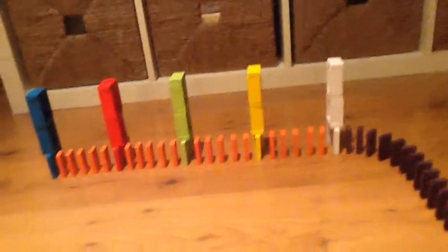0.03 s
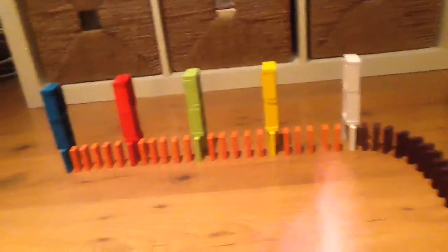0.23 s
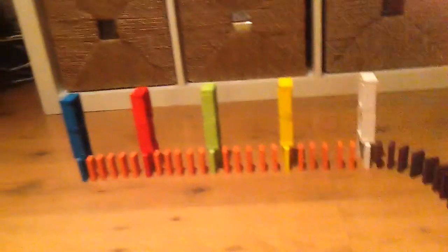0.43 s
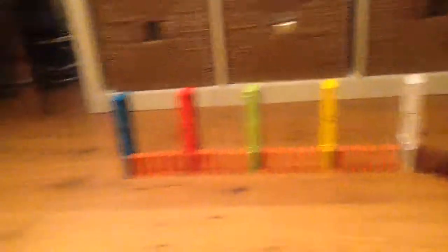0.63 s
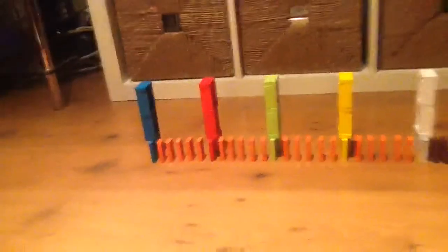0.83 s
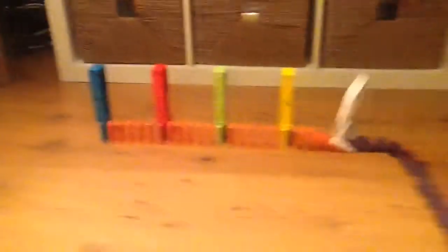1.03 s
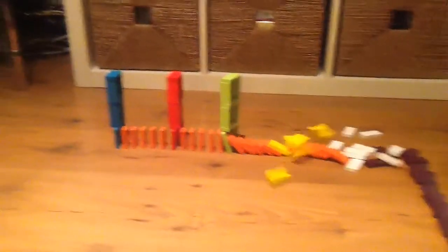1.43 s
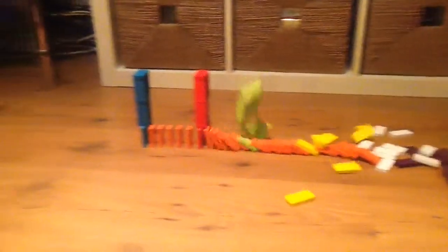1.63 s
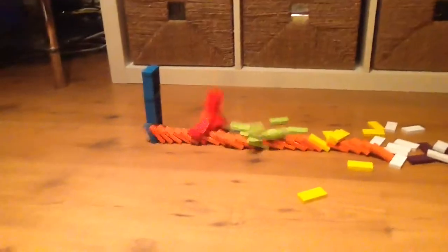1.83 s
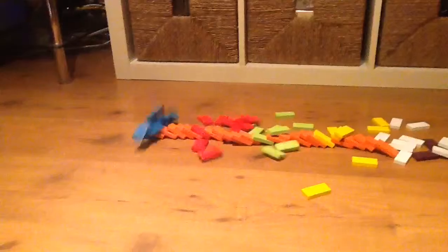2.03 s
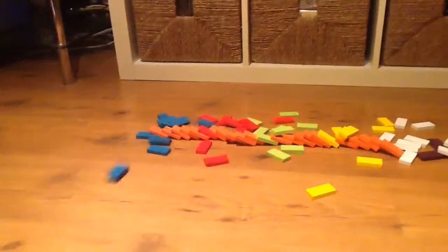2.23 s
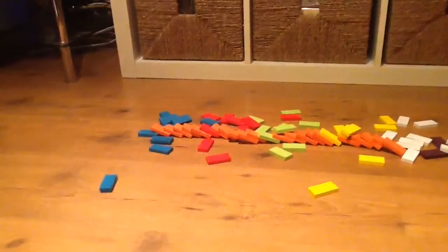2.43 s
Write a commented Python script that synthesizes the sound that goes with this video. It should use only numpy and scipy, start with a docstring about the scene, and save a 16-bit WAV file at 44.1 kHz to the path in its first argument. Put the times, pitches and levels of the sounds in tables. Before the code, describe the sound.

Plastic dominoes tick over in a chain, then small towers crash onto a wooden floor.

```python
"""Plastic dominoes topple across a wooden floor in a small room, close to a hand-held camera.
The ticking chain runs for about 1 s, then towers crash down and scatter their tiles.
Each contact is a snap, a chatter of rebounds and a short ring; edge strikes ping on.
The grip creaks on the camera case and the hand bumps it softly, over still air and faint mains hum."""
import sys
import numpy as np
from scipy import signal
from scipy.fft import rfft, irfft
from scipy.io import wavfile

SR = 44100
rng = np.random.default_rng(int(sys.argv[2]) if len(sys.argv) > 2 else 0)


def log_audio(samples):
    """Write samples as a 16-bit WAV file to the path given in sys.argv[1]."""
    # one column per channel
    frames = np.atleast_2d(samples).T
    # limit to full scale, then quantise
    limited = np.clip(frames, -1, 1)
    pcm = np.round(limited * 32767).astype(np.int16)
    wavfile.write(sys.argv[1], SR, pcm)


N = 114660
BLOW_ROOM_DB, CLATTER_ROOM_DB = -5.5, -2.5  # tail re direct sound


def undb(db):
    """Decibels to gain."""
    return 10 ** (np.asarray(db) / 20)


def unit(x):
    """Scale to unit energy."""
    return x / np.sqrt(np.sum(x ** 2))


def fade(t, t60):
    """Exponential decay, 60 dB in t60 seconds."""
    return np.exp(-np.log(1000) * t / t60)


def ring(t, hz, t60):
    """One struck mode."""
    return np.sin(2 * np.pi * hz * t) * fade(t, t60)


def add(out, start_s, sound):
    """Mix a sound in at start_s."""
    i = int(np.clip(start_s * SR, 0, N - 1))
    out[i:i + len(sound)] += sound[:N - i]


def colour(x, points, size=2048):
    """Minimum-phase filter through (f/Hz, gain/dB) points."""
    hz, db = np.array(points).T
    bin_hz = np.arange(size // 2 + 1) * SR / size
    gain = undb(np.interp(np.log(bin_hz + 1), np.log(hz), db))
    cepstrum = irfft(np.log(gain))
    cepstrum[1:size // 2] *= 2
    cepstrum[size // 2 + 1:] = 0
    return signal.fftconvolve(x, irfft(np.exp(rfft(cepstrum))))[:len(x)]


def treble(x):
    """The part above 6 kHz."""
    return signal.sosfiltfilt(signal.butter(2, 6000, "high", fs=SR, output="sos"), x)


def in_room(sound, room_db, size=12000, build_s=0.0041):
    """Add a diffuse tail, different from every spot on the floor; its treble dies first."""
    t = np.arange(size) / SR
    noise = rng.standard_normal(size) * (1 - np.exp(-t / build_s))
    high = treble(noise)
    tail = unit((noise - high) * fade(t, t60=0.26) + undb(-4) * high * fade(t, t60=0.21))
    return signal.fftconvolve(sound, (t == 0) + undb(room_db) * tail)[:size]


def contact(modes, ring_db, chatter_db, room_db):
    """One tile hit: snap, ring and tiny rebounds, the treble coloured by the spot struck."""
    scatter_db, detune, chatter_s, spot_spread_db = 9.5, 0.0617, 0.0062, 4
    t = np.arange(2000) / SR
    draws = rng.standard_normal((len(modes), 2))
    ringing = sum(undb(db + scatter_db * a) * ring(t, hz * (1 + detune * b), t60)
                  for (hz, db, t60), (a, b) in zip(modes, draws))
    rebounds = rng.standard_normal(len(t))
    chatter = rebounds * np.abs(rebounds) * np.exp(-(t / chatter_s) ** 2)
    hit = (t == 0) + undb(ring_db) * unit(ringing) + undb(chatter_db) * unit(chatter)
    spot_hz = 2000 * 2 ** (np.arange(10) / 3)
    spot_db = spot_spread_db * rng.standard_normal(len(spot_hz)) * (spot_hz > spot_hz[0])
    return in_room(unit(colour(hit, np.c_[spot_hz, spot_db])), room_db)


def blows(rows, modes, ring_db, chatter_db):
    """Single strong contacts, each with its own level and a tilt about 5 kHz."""
    out = np.zeros(N)
    for start_s, db, tilt_db in rows:
        hit = contact(modes, ring_db, chatter_db, BLOW_ROOM_DB)
        tilted = colour(hit, [(1250, -2 * tilt_db), (5000, 0), (10000, tilt_db)])
        add(out, start_s, undb(db) * tilted)
    return out


def clatter(times_s, level_db, treble_db, modes, ring_db, per_s, count=1600, scatter_db=5):
    """Light contacts at uneven moments, following a level curve and a treble curve."""
    hits = [contact(modes, ring_db, chatter_db=-6, room_db=CLATTER_ROOM_DB) for _ in range(64)]
    size_draw, sign_draw = rng.standard_normal((count, 2)).T
    starts_s = times_s[0] + (np.arange(count) + 2 * rng.random(count)) / per_s
    sizes = undb(scatter_db * np.minimum(size_draw, 2)) * np.sign(sign_draw)
    sizes *= np.sqrt(SR / per_s) / np.std(sizes)  # unit mean power
    sizes *= undb(np.interp(starts_s, times_s, level_db))
    out = np.zeros(N)
    for k in np.flatnonzero(starts_s < times_s[-1]):
        add(out, starts_s[k], sizes[k] * hits[k % len(hits)])
    treble_gain = undb(np.interp(np.arange(N) / SR, times_s, treble_db))
    return out + (treble_gain - 1) * treble(out)


def domino_chain(ring_db=-7):
    """Standing tiles tip into each other and slide down: clear ticks over a light rattle."""
    # clear ticks: t/s, level/dB, tilt/(dB/octave)
    tick_hits = [(.0287, -22.5, -7.5), (.1067, -9.5, 0), (.1224, -10, -2), (.143, 2.5, 3.5),
                 (.1513, 1, 6.5), (.1762, -1, 2.5), (.1992, 1.5, 5.5), (.2092, 0.5, 6.5), (.2492, -1.5, 9),
                 (.2545, -3.5, 5), (.3772, -0.5, 4.5), (.4082, 2, -0.5), (.4194, 8, 4.5), (.4247, 4.5, 6),
                 (.486, -2.5, 14.5), (.4962, -1.5, -0.5), (.534, -2.5, 4), (.5923, 1, 5), (.6409, 6.5, 2),
                 (.663, 1, 2), (.6668, 0, 2.5), (.699, -4, 4), (.724, -3.5, 1.5), (.754, -1, 0.5),
                 (.9389, -3.5, 1)]
    # light contacts: t/s, level/dB, gain above 6 kHz/dB
    rattle_curve = [(0, -19.5, -20), (.095, -20, -38), (.15, -11.5, 7), (.26, -1, 1), (.36, -5.5, -3),
                    (.43, -9, 11), (.52, -4.5, 12.5), (.62, -7, 6), (.72, -5, -20), (.8, -7, 1.5),
                    (.89, -15, 0.5), (.96, -10, -3), (1.02, -12.5, -1), (1.1, -46, -8)]
    # standing tile modes: f/Hz, level/dB, t60/s
    modes = [(4120, -6.5, 0.017), (5670, -0.5, 0.0065), (9050, 6, 0.009), (10400, 0, 0.013)]
    # response of tile and floorboards: f/Hz, gain/dB
    response = [(125, -26), (210, -3.5), (340, -1), (450, -3), (750, 3), (1300, -1), (2500, 0), (4200, 1),
                (6000, -1), (8700, -9), (10500, -12.5), (15000, -18.5)]
    times_s, level_db, treble_db = np.array(rattle_curve).T
    ticks = blows(tick_hits, modes, ring_db, chatter_db=-2.5)
    rattle = clatter(times_s, level_db, treble_db, modes, ring_db, per_s=330)
    return colour(undb(1.5) * ticks + undb(-28) * rattle, response)


def room_tone(air_rms_db=-63, hum_hz=101, hum_db=-75.5):
    """Still air and a faint mains hum."""
    # air spectrum: f/Hz, level/dB
    spectrum = [(30, 1), (120, 7.5), (1000, -3), (4000, -16), (15000, -5)]
    air = np.sqrt(N) * unit(colour(rng.standard_normal(N), spectrum))
    hum = np.sin(2 * np.pi * hum_hz * np.arange(N) / SR)
    return undb(air_rms_db) * air + undb(hum_db) * hum


def edge_pings(detune=0.0091, gain_db=-2):
    """Tiles struck on the edge ring in three close modes, carried on by the room."""
    # edge strikes: t/s, f/Hz, level/dB
    strikes = [(0.2486, 8900, 0.5), (0.424, 10400, -3), (0.6663, 8800, 0), (1.327, 3760, 2),
               (1.3402, 4100, 5), (1.3393, 9900, 3), (2.1745, 3660, 1)]
    t, out = np.arange(SR // 10) / SR, np.zeros(N)
    for start_s, hz, db in strikes:
        cluster = sum(ring(t, hz * (1 + detune * draw), t60=0.03) for draw in rng.standard_normal(3))
        add(out, start_s, undb(gain_db + db) * unit(in_room(cluster, CLATTER_ROOM_DB)))
    return out


def handling(creak_db=-25.5, scrape_db=-1, slip_s=0.00402, detune=0.03):
    """The grip slips and catches on the camera case, and the hand bumps it."""
    # catches of the grip: t/s, level/dB
    catches = [(0.7768, -4), (.7845, -2), (.7935, 0), (.8065, -6), (0.8129, -1)]
    # case modes: f/Hz, level/dB, t60/s
    modes = [(231, -7, 0.068), (800, -7, 0.039), (912, 2, 0.039), (1043, 0, 0.032), (1350, 1.5, 0.009),
             (2060, 1, 0.013)]
    # soft hand bumps: t/s, level/dB, f/Hz, t60/s
    bumps = [(0.589, -24.5, 178, 0.016), (0.833, -23, 208, 0.053), (0.864, -34.5, 205, 0.11),
             (2.3944, -18.5, 327.7, 0.011)]
    t, out = np.arange(SR // 5) / SR, np.zeros(N)
    for start_s, db in catches:
        case = sum(undb(mode_db) * ring(t, hz * (1 + detune * rng.standard_normal()), t60)
                   for hz, mode_db, t60 in modes)
        scrape = unit(rng.standard_normal(len(t)) * t * np.exp(-t / slip_s))
        add(out, start_s, undb(creak_db + db) * case)
        add(out, start_s - slip_s, undb(creak_db + scrape_db + db) * signal.fftconvolve(scrape, case))
    knock = undb(-8) * ring(t, hz=1080, t60=0.014)
    for start_s, db, hz, t60 in bumps:
        add(out, start_s, undb(db) * (ring(t, hz, t60) + knock))
    return colour(out, [(50, -37), (110, -14), (180, 0.0), (1800, 0.5), (4000, -13)])


def falling_towers(ring_db=-3.5):
    """Loose tiles drop, bounce and ring freely."""
    # hard landings: t/s, level/dB, tilt/(dB/octave)
    landing_hits = [(1.0078, -3.5, -0.5), (1.035, 0, -3.5), (1.0388, -6, -2), (1.0522, 3.5, -2.5),
                    (1.0719, 1.5, 9.5), (1.0886, 8, 3), (1.0925, -1, 1), (1.1335, 11, 4.5),
                    (1.138, 5.5, -2), (1.162, 12, 3), (1.1676, 10.5, 3.5), (1.1712, 12, 2.5),
                    (1.204, 3.5, 5.5), (1.212, 7, 2), (1.2578, 8, 1.5), (1.2705, 5, 8.5),
                    (1.3265, 3.5, -1.5), (1.3402, 8, 3.5), (1.3457, 6, -1.5), (1.391, -9.5, -8),
                    (1.4512, -0.5, -2.5), (1.4936, 0.5, 0), (1.52, -1.5, -1), (1.5486, 4.5, 2.5),
                    (1.631, 4.5, 1), (1.635, 5, -3), (1.6698, 7.5, 10.5), (1.6768, 10, 3), (1.684, 5.5, 5),
                    (1.6912, 7.5, -0.5), (1.7772, 7, 1), (1.7974, -12, -8), (1.8052, 8.5, -0.5),
                    (1.8495, 4.5, 0), (1.8695, 9.5, 0), (1.8765, 8.5, 0), (1.937, 8.5, 0.5),
                    (1.9775, 11.5, 2), (1.9875, 7, 8), (1.9915, 11.5, 4.5), (2.009, 0.5, 11),
                    (2.053, 0.5, 0.5), (2.0725, 6, -0.5), (2.124, 1.5, -0.5), (2.1545, 3, 0),
                    (2.1745, 4, -1.5), (2.1968, 2, 1), (2.2448, 0.5, -0.5), (2.3284, -3.5, 1),
                    (2.3432, -3.5, 0), (2.4398, -8, 0.5)]
    # tumbling and skittering: t/s, level/dB
    tumble_curve = [(1.02, -14), (1.07, 4.5), (1.12, -9), (1.18, -2), (1.28, -1.5), (1.37, -10),
                    (1.44, -6.5), (1.53, -12.5), (1.605, -6.5), (1.65, 0.5), (1.71, -2), (1.75, -6),
                    (1.83, -4), (1.89, 0.5), (1.96, -3), (2.04, -3.5), (2.16, -7), (2.24, -7),
                    (2.36, -10.5), (2.48, -18.5), (2.52, -65)]
    # loose tile modes: f/Hz, level/dB, t60/s
    modes = [(833, -8, 0.017), (3250, -33, 0.035), (3614, 2.5, 0.014), (4005, 1.5, 0.033),
             (5420, -1.5, 0.019), (6133, 12, 0.018), (7030, -2, 0.032), (8740, 8.5, 0.023)]
    # response of tile and floorboards: f/Hz, gain/dB
    response = [(60, -50.5), (130, -20), (210, -8), (330, -5.5), (450, -9.5), (750, -1.5), (1400, -2),
                (2600, -4), (3600, 3), (5000, -0.5), (7500, 0), (10500, -5.5), (15000, -13)]
    times_s, level_db = np.array(tumble_curve).T
    treble_db = 2 + 0.7 * level_db  # louder tumbling is brighter
    landings = blows(landing_hits, modes, ring_db, chatter_db=3)
    tumble = clatter(times_s, level_db, treble_db, modes, ring_db, per_s=420)
    return colour(landings + undb(-24.5) * tumble, response)


def scene():
    """Mono mix of room tone, dominoes and handling noise."""
    return (room_tone() + domino_chain() + falling_towers() + edge_pings() + handling())[None]


def record(dry, low_cut_hz=136, top_hz=15450, ceiling=0.7):
    """Round the highest peaks between two low-passes, and cut the rumble."""
    low_pass = signal.ellip(10, 0.2, 75, top_hz, fs=SR, output="sos")
    high_pass = signal.butter(2, low_cut_hz, "high", fs=SR, output="sos")
    rounded = ceiling * np.tanh(signal.sosfilt(low_pass, dry) / ceiling)
    return signal.sosfilt(low_pass, signal.sosfilt(high_pass, rounded))


dry = scene()
out = record(dry)
log_audio(out)
```